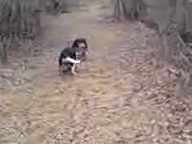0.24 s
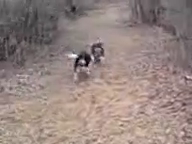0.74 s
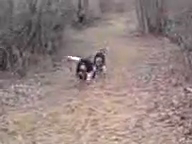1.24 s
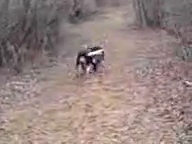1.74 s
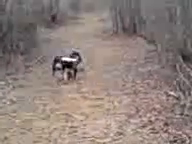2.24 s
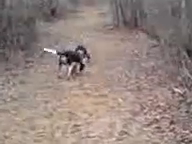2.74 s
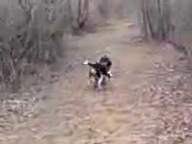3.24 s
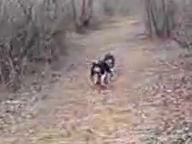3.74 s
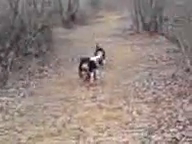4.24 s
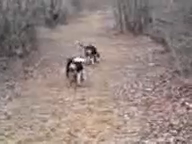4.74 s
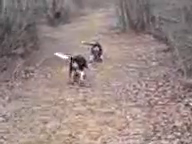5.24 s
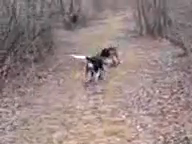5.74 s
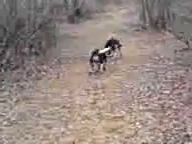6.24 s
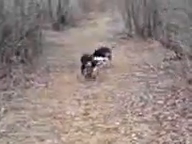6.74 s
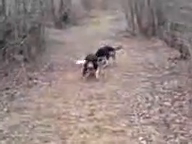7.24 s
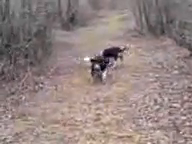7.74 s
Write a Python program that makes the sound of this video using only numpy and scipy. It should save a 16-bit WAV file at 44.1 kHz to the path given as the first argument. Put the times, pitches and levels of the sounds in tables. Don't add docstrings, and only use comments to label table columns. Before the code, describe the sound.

Two hound puppies call excitedly a few metres from a small camera on a leafy woodland trail. A distant low howl is just ending at 0 s as the first yap starts. Short, arched, mid-high yaps then follow about twice a second to the end, a couple jumping upward midway near 4.4 and 5.7 s. Over them the other pup bays: lower, rough starts at about 0.2, 1.45, 2.6, 4.05, 4.9, 5.9, 6.8 and 7.9 s, most cracking up into a clearer held note, the one at 4.05 collapsing. From 3.2 to 4 s only yaps remain. Trees return a thin dull tail. Behind lie soft wind thuds, strongest around 0.2 to 1.5 and 4.2 s, low murmur fading slowly, muted hiss, small crackles of paws in leaves, faint trilled bird whistles from 4.5 to 7 s, and a barely audible far howl at 6.7 s.

```python
import sys
import numpy as np
from scipy import signal
from scipy.fft import rfft, irfft, next_fast_len
from scipy.io import wavfile
from scipy.ndimage import uniform_filter1d

SR = 44100
rng = np.random.default_rng(int(sys.argv[2]) if len(sys.argv) > 2 else 0)


def decibels_to_gain(level_db):
    exponent = np.asarray(level_db, float) / 20
    return 10 ** exponent


def store_pcm(level_fs):
    pcm = np.round(np.clip(level_fs, -1, 1) * 32767).astype(np.int16)
    wavfile.write(sys.argv[1], SR, np.atleast_2d(pcm).T)


N = 352359

# frequency in Hz, gain in dB.
THROAT = [(200, -22.5), (350, -15), (600, -3), (1050, -4), (1300, -3.5), (1650, -3), (2100, -14.5),
          (2500, -23.5), (3200, -53.5), (6000, -58.5)]


def scene():
    low = voice(bays(), order=4, fade_db=0, side_ratio=.333, side_db=-16, jitter=.016, chaos=.05,
                rasp_db=-14.5, cough_db=-9.5, cough_s=0.032)
    high = voice(head(), order=3, fade_db=0, side_ratio=.23, side_db=-19, jitter=.006, chaos=.03,
                 rasp_db=-12.5, cough_db=-23, cough_s=0.029)
    yaps = voice(yapping(), order=2, fade_db=22, side_ratio=.14, side_db=-21, jitter=.011, chaos=.16,
                 rasp_db=-20.5, cough_db=-8.5, cough_s=0.047)
    pups = low + high + yaps
    return (pups + trees(pups) + faint_howls() + birds() + paws() + air())[None]


def bays():
    # start in s, end in s, pitch in Hz, sag in Hz per s, second partial in dB.
    breaking = [(0.23, 0.55, 414.2, -27.5, -25.5), (1.45, 1.822, 427.2, 73.5, -22.5),
                (4.87, 5.14, 426.2, -27.5, -22.5), (5.88, 6.257, 421, 46, -25.5),
                (7.915, 8.2, 420, -3.5, -26.5)]
    collapsing = [(4.045, 4.26, 414.4, -150, -29)]
    opening = [(2.61, 2.965, 413.6, -9, -30.5), (6.83, 7.145, 423.9, 0, -29)]
    way = dict(scoop=0.15, rise_s=.05, drop=-.04, fall_s=0.011, plunge=0, slack_db=84, limp_db=97)
    calls = [*chest(breaking, **way)]
    calls += chest(collapsing, **dict(way, drop=0.58, fall_s=0.021, slack_db=58.5, limp_db=22.5))
    calls += chest(opening, **dict(way, scoop=.11, rise_s=0.038))
    return calls


def chest(rows, **way):
    first_db, fourth_db, open_db = -26.5, -34.5, -31.5
    bright_s, closing_db_per_s = 0.047, 10.5
    for s0, s1, hz, sag, second_db in rows:
        t, f, loss = breath(s0, s1, hz, sag, **way)
        closing = closing_db_per_s * max(second_db - open_db, 0) * np.maximum(t - s0 - bright_s, 0)
        yield np.transpose([t, f, first_db + loss, second_db + loss, fourth_db + loss - closing])


def head():
    # start in s, end in s, pitch in Hz, sag in Hz per s, level in dB.
    flips = [(0.56, 0.794, 516.5, -4, -23), (1.83, 1.94, 564.3, 950, -24), (5.143, 5.239, 521, 305, -24.5)]
    # start in s, end in s, pitch in Hz, level in dB, second partial in dB.
    held = [(0.8, 1.142, 487, -21.5, -40), (1.945, 2.165, 448.6, -25.5, -32),
            (2.97, 3.16, 525.6, -35, -36.5), (5.24, 5.605, 482.5, -20, -37),
            (7.15, 7.345, 528, -27.5, -32.5)]
    failing = [(1.125, 1.2, 514.4, -39.5, -58.5), (6.265, 6.48, 509.5, -31.5, -41),
               (7.322, 7.55, 512.3, -26, -31)]
    sag_hz_per_s, flip_second_db, third_db = 30, -18.5, -12.5
    held_way = dict(scoop=.04, rise_s=0.018, drop=0.059, fall_s=.04, plunge=0.5, slack_db=50.5, limp_db=151)
    failing_way = dict(scoop=.1, rise_s=.015, drop=0.59, fall_s=.045, plunge=0.15, slack_db=31, limp_db=20.5)
    flip_way = dict(held_way, scoop=0.097, rise_s=0.012, drop=0, plunge=0, slack_db=-3, limp_db=698.5,
                    tiring=0)
    rows = [(s0, s1, hz, sag, db, db + flip_second_db, flip_way) for s0, s1, hz, sag, db in flips]
    for notes, way in (held, held_way), (failing, failing_way):
        rows += [(s0, s1, hz, sag_hz_per_s, db, second_db, way) for s0, s1, hz, db, second_db in notes]
    for s0, s1, hz, sag, db, second_db, way in rows:
        t, f, loss = breath(s0, s1, hz, sag, **way)
        yield np.transpose([t, f, db + loss, second_db + loss, second_db + third_db + loss])


def yapping():
    # start in s, end in s, pitch in Hz, level in dB, second partial in dB.
    plain = [(0.072, 0.302, 559, -24, -34), (0.597, 0.787, 575, -24, -36.5), (0.95, 1.163, 543, -28.5, -33),
             (1.339, 1.57, 547, -25, -32.5), (1.85, 2.103, 555.6, -23, -34.5),
             (2.25, 2.453, 559, -24.5, -35), (2.615, 2.821, 566, -24, -34.5),
             (3.143, 3.358, 582, -26, -32.5), (3.519, 3.788, 550.3, -26.5, -35),
             (3.959, 4.229, 552.2, -24, -36), (4.811, 5.056, 538, -28.5, -37.5),
             (5.385, 5.566, 556.3, -24, -36), (6.215, 6.419, 558, -28.5, -31.5),
             (6.87, 7.163, 545, -30.5, -30.5), (7.394, 7.632, 552.6, -27, -30),
             (7.844, 8.065, 550, -24.5, -30.5)]
    # start in s, jump in s, end in s, low pitch in Hz, high pitch in Hz.
    stepped = [(4.391, 4.466, 4.66, 474.5, 548.4), (5.723, 5.799, 5.96, 484, 582.6)]
    way = dict(scoop=.15, rise_s=.025, drop=.14, fall_s=.05, plunge=.3, slack_db=15.5, limp_db=122,
               snap=.2, step=.08)
    low_way = dict(way, scoop=.03, drop=0, plunge=0, step=0)
    high_way = dict(way, scoop=0, snap=0)
    low_db, high_db = (-25.5, -35), (-25, -40.5)
    catch_db = -14
    calls = [yap(*row, catch_db, **way) for row in plain]
    for s0, jump, s1, low, high in stepped:
        first = yap(s0, jump, low, *low_db, catch_db, **low_way)
        then = yap(jump, s1, high, *high_db, 0, **high_way)
        calls.append(np.vstack([first[:-1], then]))
    return calls


def yap(s0, s1, hz, db, second_db, catch_db, **way):
    sag_hz_per_s, catch_s = 60, 0.01
    pop_db, pop_s, pop_width_s = 5.5, 0.035, 0.012
    t, f, loss = breath(s0, s1, hz, sag_hz_per_s, **way)
    pop = pop_db * np.exp(-((t - s0 - pop_s) / pop_width_s) ** 2)
    catch = catch_db * np.exp(-((t - s0) / catch_s) ** 2)
    first = db + loss + 0.096 * pop + catch
    second = second_db + 1.3 * loss + pop + catch
    return np.transpose([t, f, first, second])


def breath(s0, s1, hz, sag, scoop, rise_s, drop, fall_s, plunge, slack_db, limp_db, snap=0, step=0, tiring=1):
    snap_s, plunge_s = 0.0076, .013
    step_before_end_s, step_s = .065, 0.0061
    t = np.linspace(s0, s1, 80)
    sagging = sag * (t - s0) / hz
    slack = scoop * np.exp(-(t - s0) / rise_s) + snap * np.exp(-(t - s0) / snap_s) + sagging
    slack += step / (1 + np.exp((s1 - step_before_end_s - t) / step_s))
    slack += plunge * np.exp(-(s1 - t) / plunge_s)
    ending = drop * np.exp(-(s1 - t) / fall_s)
    loose = slack + np.abs(ending) - (1 - tiring) * sagging
    return t, hz * np.maximum(1 - slack - ending, .2), -slack_db * loose - limp_db * loose ** 2


def voice(calls, order, fade_db, side_ratio, side_db, jitter, chaos, rasp_db, cough_db, cough_s):
    tone, turbulence = np.zeros(N), np.zeros(N)
    for call in calls:
        s, *columns = np.transpose(call)
        t = np.arange(s[0], s[-1] + .013, 1 / SR)
        n = len(t)
        hz, first_db, *upper_db = (uniform_filter1d(np.interp(t, s, c), 400) for c in columns)
        start = np.exp(-(t - s[0]) / cough_s)
        stumble = (jitter * decibels_to_gain(strain_db(t)) + chaos * start ** 2) * walk(300, n)
        phase = 2 * np.pi * np.cumsum(hz * (1 + stumble + 0.0048 * walk(28.3, n))) / SR
        wave = decibels_to_gain(first_db) * np.sin(phase)
        wave += decibels_to_gain(upper_db[0] + 2.0 * walk(25, n)) * np.sin(2 * phase + 1)
        for k in range(3, 8):
            db = upper_db[-1] + throat_db(k * hz) - throat_db(order * hz) - fade_db * (1 - start)
            db += (k < order) * 0.76 * (upper_db[0] - upper_db[-1] - 16.0)
            wave += decibels_to_gain(db + 4.5 * walk(30, n)) * np.sin(k * phase + k)
        pressed_db = np.minimum(upper_db[0] - first_db + 6, 0)
        shake = decibels_to_gain(side_db + 1.4 * pressed_db + 3 * walk(25, n))
        shake *= np.sin(side_ratio * phase + 1.5 * walk(50, n))
        shimmer = decibels_to_gain(0.29 * walk(200, n))
        edge = np.clip(np.minimum((t - s[0]) / .005, (t[-1] - t) / .012), 0, 1)
        add(tone, np.sqrt(2) * edge * shimmer * (1 + 2 * shake) * wave, s[0])
        effort = np.sqrt(decibels_to_gain(first_db) ** 2 + decibels_to_gain(upper_db[0]) ** 2)
        rasp = decibels_to_gain(rasp_db + strain_db(t) + 3.5 * walk(24, n)) * decibels_to_gain(upper_db[0])
        cough = decibels_to_gain(cough_db) * effort.max() * start
        add(turbulence, edge * (rasp + cough) * (1 + 0.49 * np.cos(phase)), s[0])
    hoarse = colour(turbulence * rng.standard_normal(N), THROAT) * np.sqrt(SR / 3000)
    return colour(tone, [(200, -34.0), (290, -22), (370, -0.5), (20000, 5)]) + hoarse


def strain_db(t):
    # start in s, end in s, extra rasp in dB.
    strained = [(0.498, 0.573, -3), (1.803, 1.891, 12), (2.623, 2.932, 1.5), (2.94, 3.016, 8),
                (4.061, 4.231, 7), (4.39, 4.461, 7), (5.361, 5.471, 12.5), (5.743, 5.798, 9),
                (6.204, 6.262, 6), (6.827, 7.091, 3.5), (7.115, 7.172, 9), (7.196, 7.246, 9.5),
                (7.383, 7.417, -0.5)]
    return uniform_filter1d(sum(db * ((t > s0) & (t < s1)) for s0, s1, db in strained), 400)


def throat_db(hz):
    throat_hz, gain_db = np.transpose(THROAT)
    return np.interp(np.log(hz), np.log(throat_hz), gain_db)


def trees(x):
    t60_s, level_db = .8, -24
    t = np.arange(int(.8 * SR)) / SR
    tail = rng.standard_normal(len(t)) * np.exp(-np.log(1000) * t / t60_s) * (t > .02)
    tail /= np.sqrt(np.sum(tail ** 2))
    tail = colour(tail, [(250, -6), (410, 3), (500, -8), (1500, -10), (5000, -25)])
    return decibels_to_gain(level_db) * signal.fftconvolve(x, tail)[:N]


def faint_howls():
    # start in s, end in s, pitch in Hz, level in dB.
    howls = [
        (0, 0.088, 404, -43),
        (6.676, 6.826, 651, -56),
    ]
    out = np.zeros(N)
    for s0, s1, hz, db in howls:
        t = np.arange(0, s1 - s0, 1 / SR)
        phase = 2 * np.pi * hz * t + .5 * walk(30, len(t))
        howl = np.sin(phase) + 0.14 * np.sin(2 * phase)
        add(out, decibels_to_gain(db) * signal.windows.tukey(len(t), .4) * howl, s0)
    return out


def birds():
    # start in s, end in s, start pitch in Hz, end pitch in Hz, level in dB.
    whistles = [(4.5, 4.66, 5680, 5550, -63), (4.83, 5.07, 5600, 5460, -60), (5.22, 5.52, 5580, 5450, -59),
                (5.74, 5.88, 5400, 4500, -57), (5.8, 6.22, 4500, 4420, -57), (6.19, 6.38, 4000, 3870, -57),
                (4.55, 4.85, 4050, 4000, -70), (6.83, 6.93, 4000, 3900, -59)]
    trill_per_s, trill_below_hz = 18, 5430
    out = np.zeros(N)
    for s0, s1, hz0, hz1, db in whistles:
        t = np.arange(0, s1 - s0, 1 / SR)
        hz = np.interp(t, [0, t[-1]], [hz0, hz1]) * (1 + .016 * walk(150, len(t)))
        trill = np.cos(np.pi * trill_per_s * (hz0 < trill_below_hz) * t) ** 2
        throb = (.25 + .75 * trill) * decibels_to_gain(4 * walk(120, len(t)))
        whistle = np.sin(2 * np.pi * np.cumsum(hz) / SR)
        add(out, decibels_to_gain(db) * throb * signal.windows.tukey(len(t), .3) * whistle, s0)
    return out


def paws():
    # time in s, peak level in dB, length in s.
    steps = [(.24, -57, .02), (.57, -49, .014), (.645, -46, .01), (.9, -52, .012), (2.8, -54, .015),
             (3.0, -59, .09), (3.28, -62, .03), (3.87, -58, .07), (3.97, -50, .03), (4.06, -50, .02),
             (4.58, -57, .05), (6.25, -57, .06), (7.235, -54, .04), (7.3, -61, .06), (7.4, -55, .015),
             (7.465, -50, .014), (7.59, -62, .01), (7.816, -62, .004)]
    shower = np.zeros(N)
    for s, db, length in steps:
        add(shower, decibels_to_gain(db) * np.exp(-np.arange(SR // 4) / SR / max(length, .003)), s)
    clicks = rng.standard_normal(N) * decibels_to_gain(3.0 * rng.exponential(size=N))
    return colour(2 * shower * clicks, [(800, -20), (3000, 0), (4500, -1), (6000, -7), (16000, -12)])


def air():
    # time in s, swell in dB, length in s.
    gusts = [(0.195, 20, 0.11), (0.896, 18.5, 0.66), (1.949, 10.5, 0.3), (4.223, 15.5, 0.41),
             (4.965, 8, .15), (6.84, 8.5, 0.15), (7.7, 6.5, 0.13)]
    # frequency in Hz, density in dB per Hz.
    hiss_density = [(20, -82), (100, -82), (400, -85), (900, -88), (1600, -94), (3000, -100), (5000, -102),
                    (7000, -106), (16000, -109)]
    calm_db, murmur_db, murmur_fade_db_per_s, murmur_gust_share = -64, -46, 6, 0.051
    t = np.arange(N) / SR
    gust_db = sum(db * np.exp(-((t - s) / length) ** 2) for s, db, length in gusts)
    rumble = colour(rng.standard_normal(N), [(12, -4.0), (25, 3.0), (70, -3.5), (130, -18.5), (400, -57.5)])
    murmur = colour(rng.standard_normal(N), [(80, -10.5), (140, -2.5), (210, 14.0), (290, 3.0), (600, -44)])
    swell_db = murmur_db - murmur_fade_db_per_s * t + murmur_gust_share * gust_db
    out = unit(rumble) * decibels_to_gain(calm_db + gust_db + 2.5 * walk(7, N))
    out += unit(murmur) * decibels_to_gain(swell_db + 0.5 * walk(5.5, N))
    hiss = rng.standard_normal(N) * decibels_to_gain(0.54 * walk(2.8, N)) * np.sqrt(SR / 2)
    return out + colour(hiss, hiss_density)


def colour(x, table):
    hz, db = np.transpose(table)
    size = next_fast_len(len(x) + 4096)
    f = np.maximum(np.arange(size // 2 + 1) * SR / size, 1)
    gain = decibels_to_gain(np.interp(np.log(f), np.log(hz), db))
    spectrum = rfft(np.pad(settle(x), 2048, "reflect", reflect_type="odd"), size)
    return irfft(spectrum * gain, size)[2048:2048 + len(x)]


def settle(x):
    return x * np.minimum(np.arange(len(x))[::-1] / (.004 * SR), 1)


def unit(x):
    return x / np.sqrt(np.mean(x ** 2))


def walk(rate, count):
    k = int(SR / rate)
    held = np.repeat(rng.standard_normal(count // k + 1), k)
    return 0.82 * uniform_filter1d(uniform_filter1d(held, k), k)[:count]


def add(out, x, s):
    i = int(s * SR)
    out[i:i + len(x)] += x[:N - i]


def thin_treble(x, floor_db, share):
    lead = 1024 - 781
    padded = np.pad(settle(x), (lead, 2048), "reflect", reflect_type="odd")
    hz, _, z = signal.stft(padded, SR, "cosine", 2048, 1024)
    mark = decibels_to_gain(floor_db) * (2 * np.sum(np.abs(z) ** 2, axis=0)) ** (share / 2)
    band = np.floor(np.log(np.maximum(hz, 1300) / 1300) / np.log(1.11)).astype(int)
    for k in range(1, band.max() + 1):
        z[band == k] *= np.abs(z[band == k]).max(axis=0) > mark
    return signal.istft(z, SR, "cosine", 2048, 1024)[1][lead:lead + N]


def band_limit(x):
    return signal.sosfilt(signal.butter(12, 15830, fs=SR, output="sos"), x)


def record(dry):
    rounded = np.tanh(2 * dry[0]) / 2
    mix = thin_treble(rounded, floor_db=-56, share=.8)[None]
    return band_limit(mix)


dry = scene()
out = record(dry)
store_pcm(out)
```